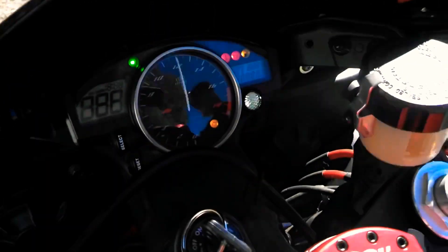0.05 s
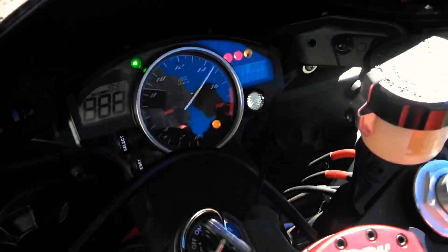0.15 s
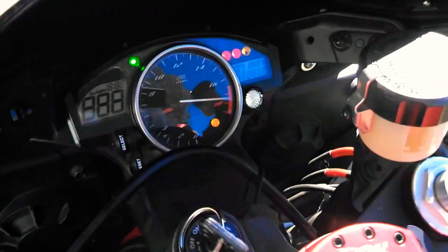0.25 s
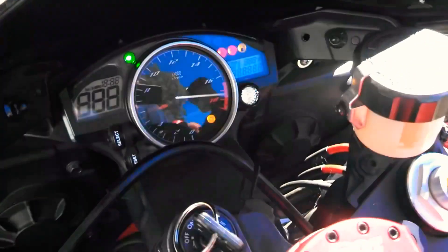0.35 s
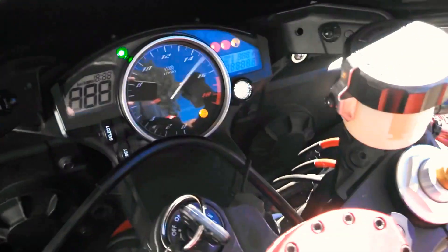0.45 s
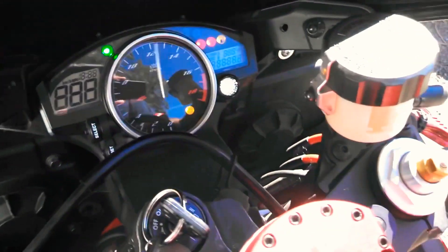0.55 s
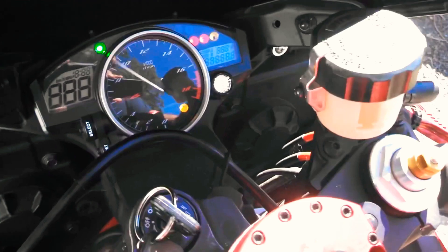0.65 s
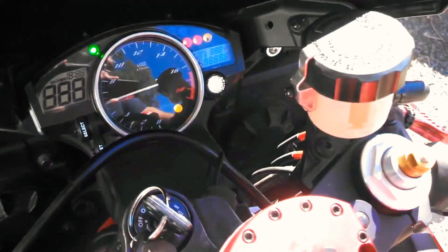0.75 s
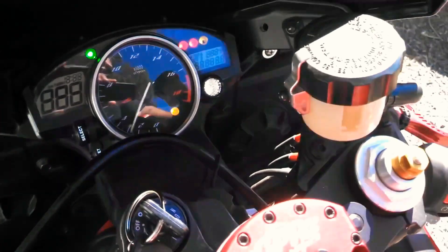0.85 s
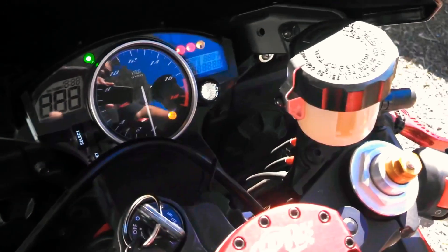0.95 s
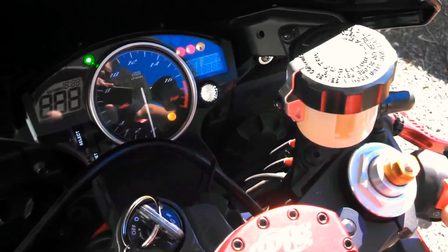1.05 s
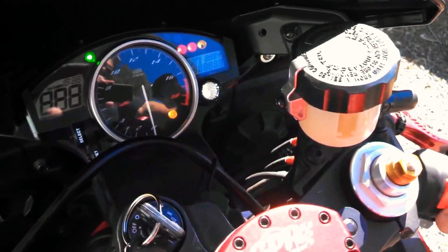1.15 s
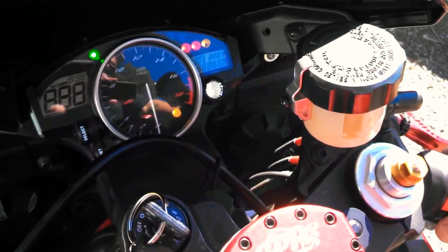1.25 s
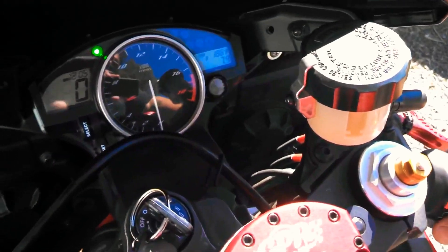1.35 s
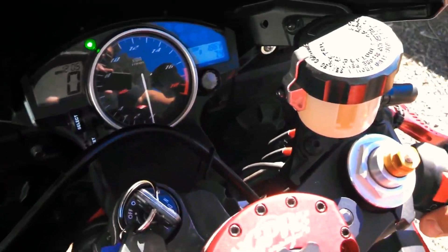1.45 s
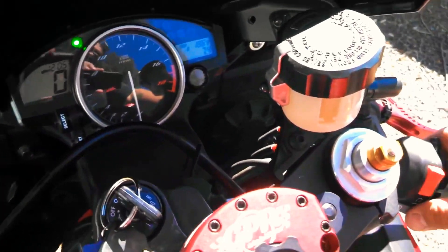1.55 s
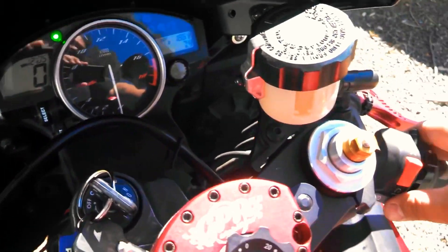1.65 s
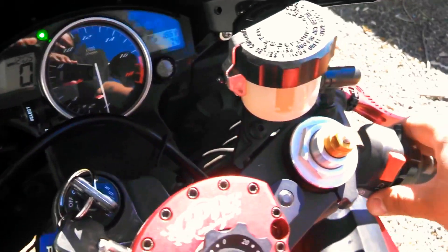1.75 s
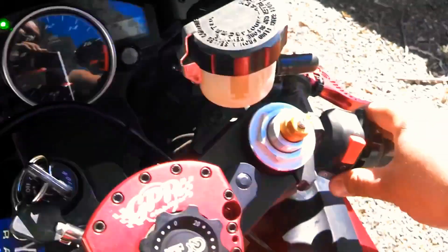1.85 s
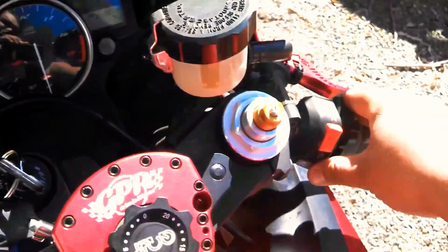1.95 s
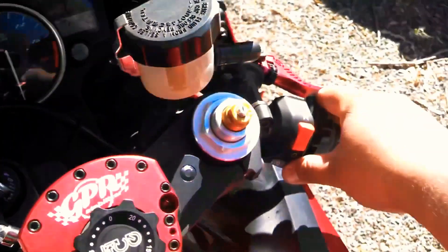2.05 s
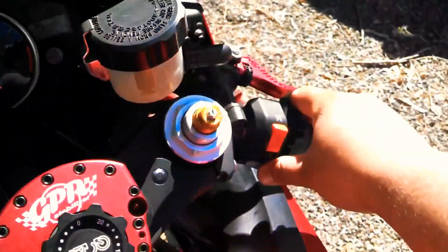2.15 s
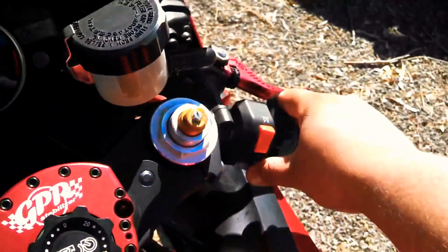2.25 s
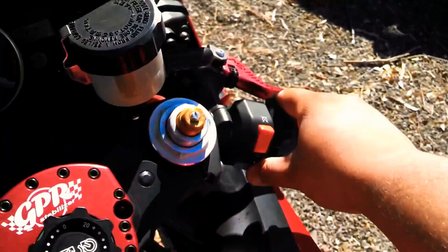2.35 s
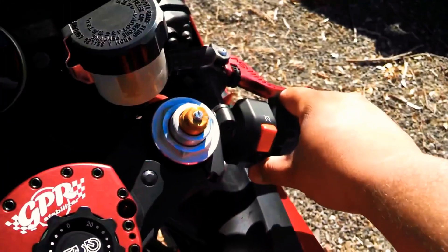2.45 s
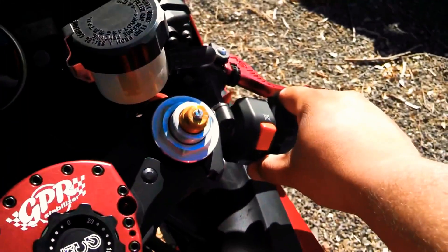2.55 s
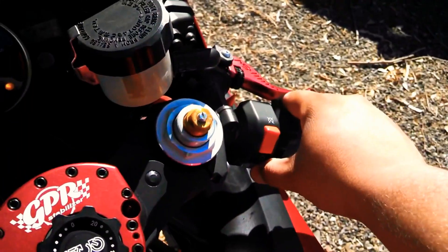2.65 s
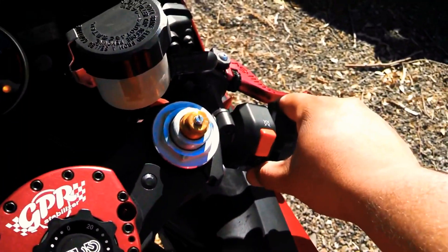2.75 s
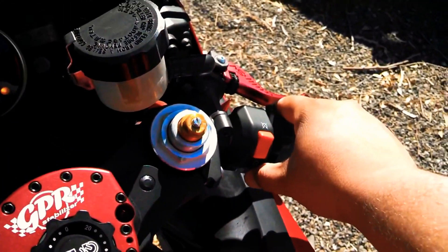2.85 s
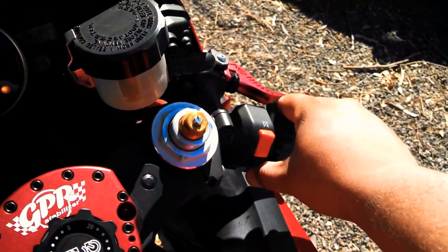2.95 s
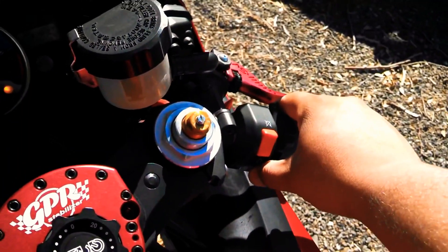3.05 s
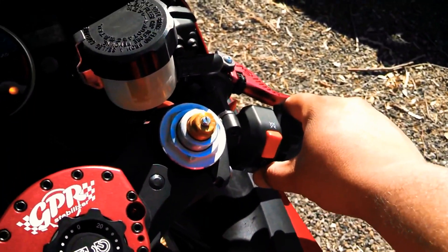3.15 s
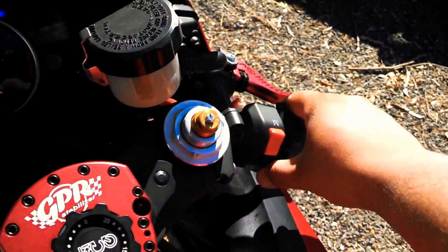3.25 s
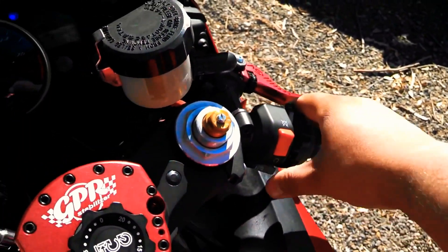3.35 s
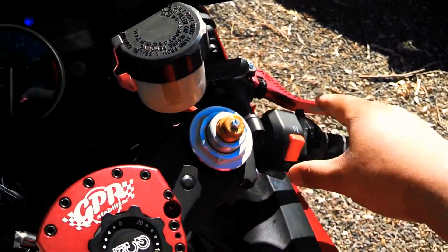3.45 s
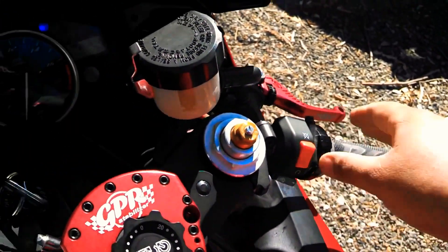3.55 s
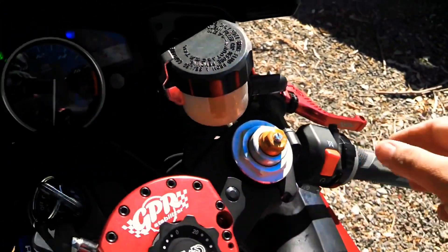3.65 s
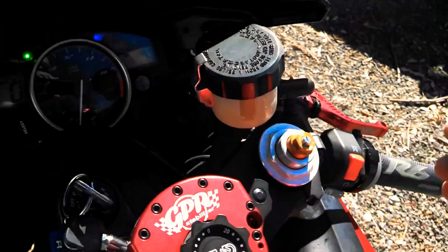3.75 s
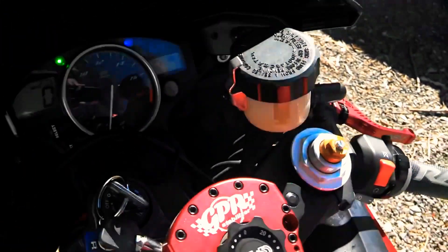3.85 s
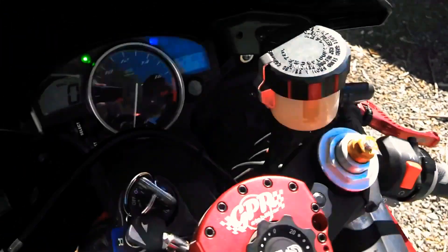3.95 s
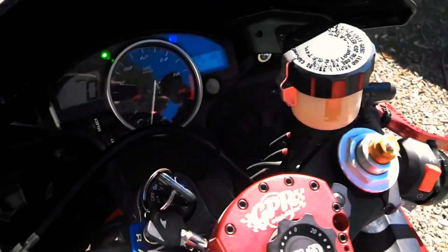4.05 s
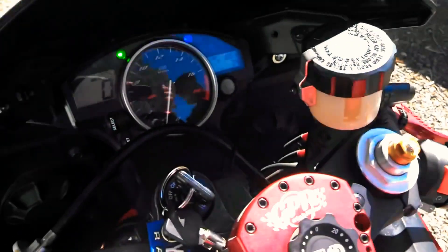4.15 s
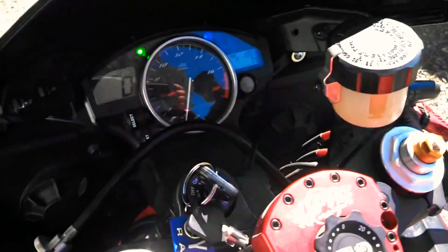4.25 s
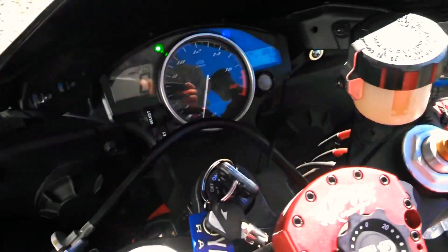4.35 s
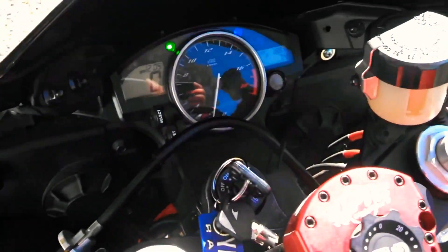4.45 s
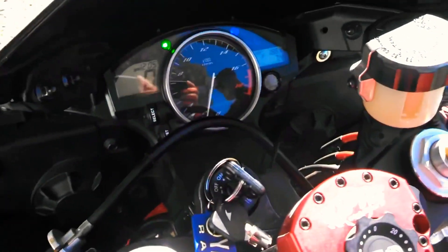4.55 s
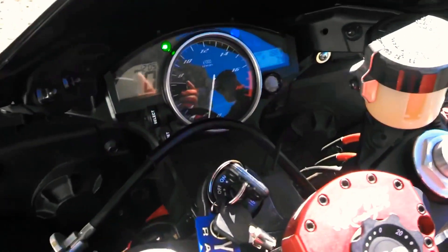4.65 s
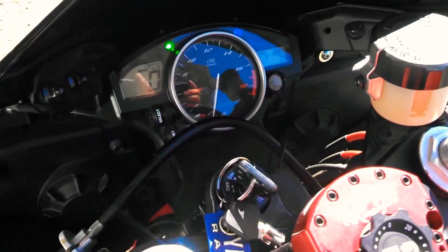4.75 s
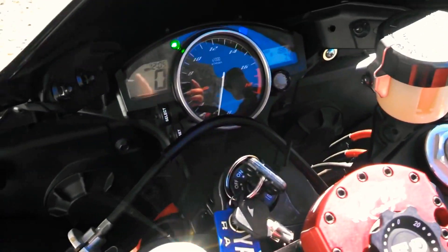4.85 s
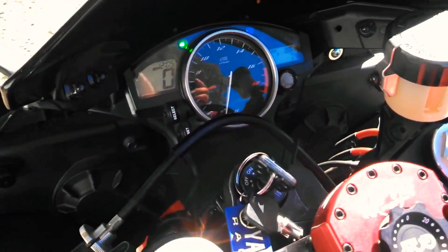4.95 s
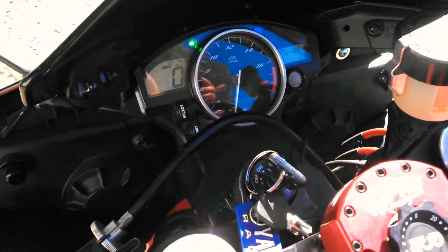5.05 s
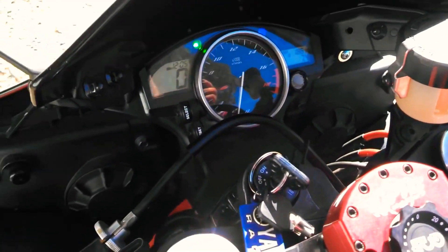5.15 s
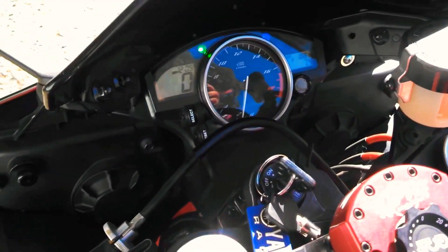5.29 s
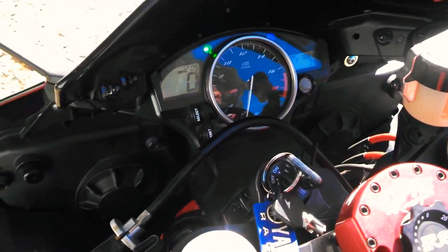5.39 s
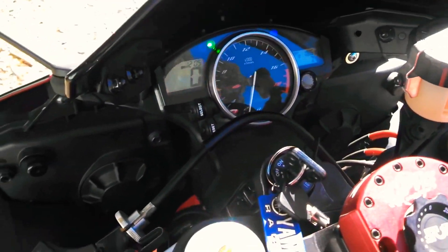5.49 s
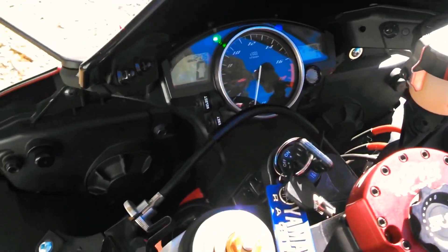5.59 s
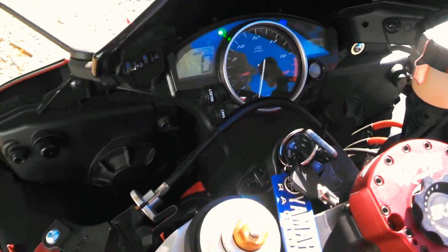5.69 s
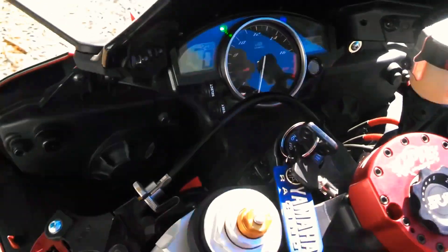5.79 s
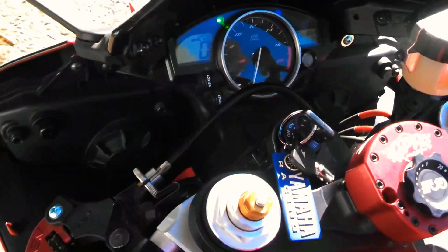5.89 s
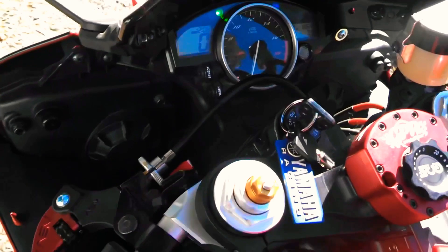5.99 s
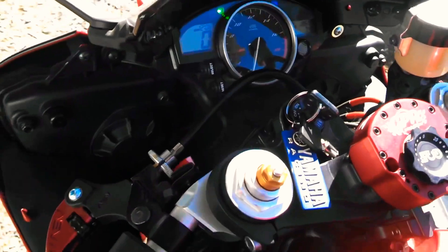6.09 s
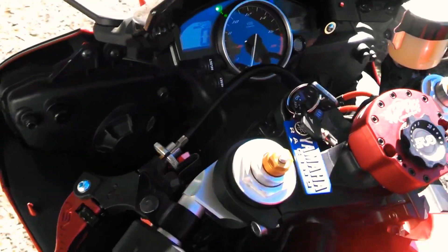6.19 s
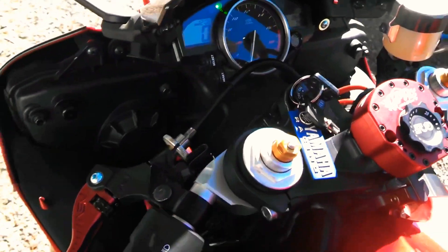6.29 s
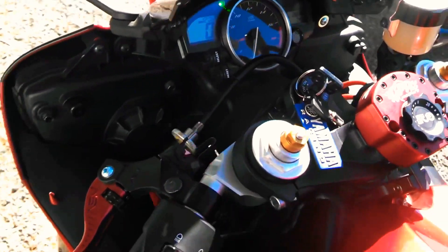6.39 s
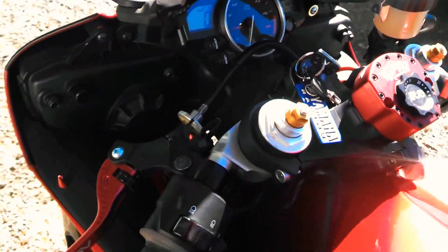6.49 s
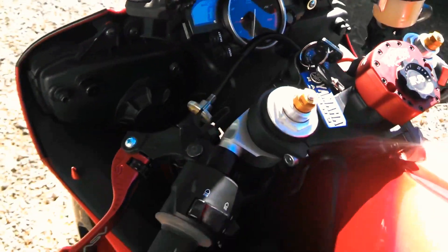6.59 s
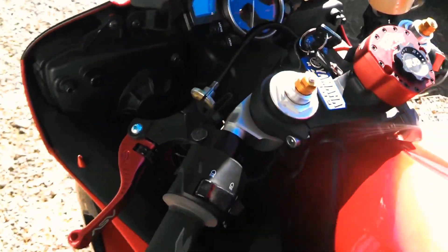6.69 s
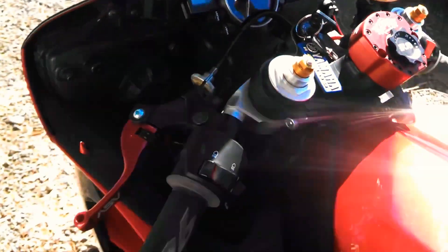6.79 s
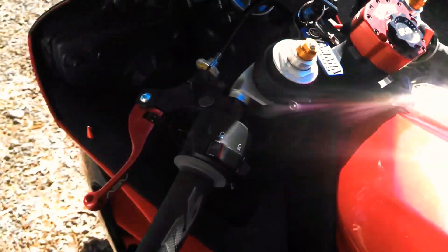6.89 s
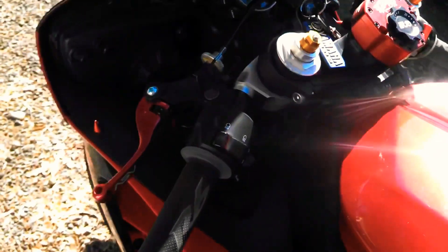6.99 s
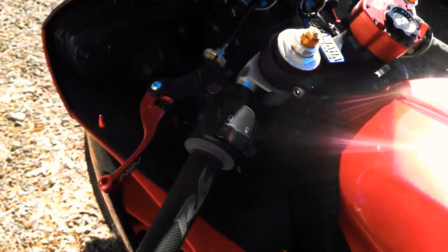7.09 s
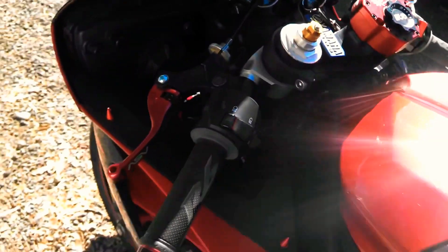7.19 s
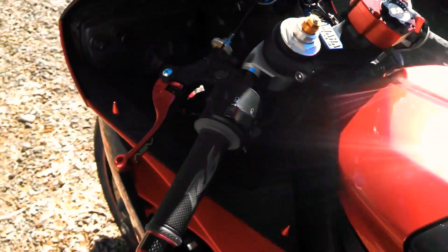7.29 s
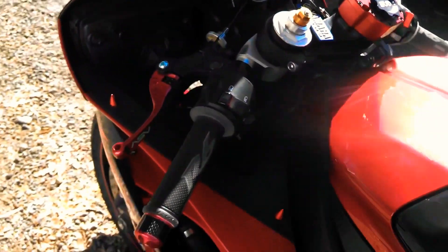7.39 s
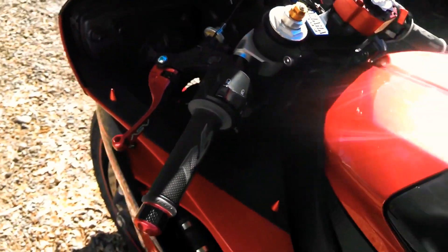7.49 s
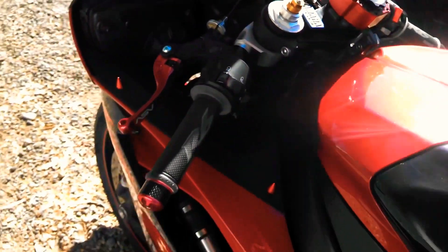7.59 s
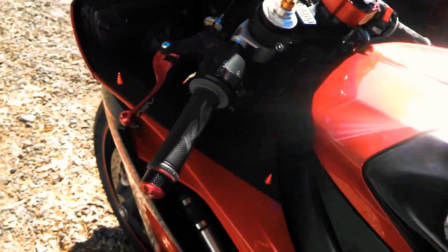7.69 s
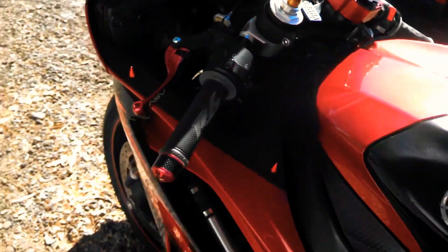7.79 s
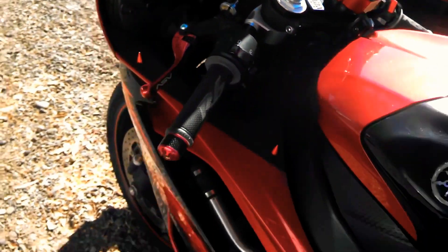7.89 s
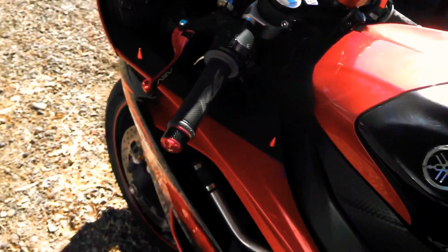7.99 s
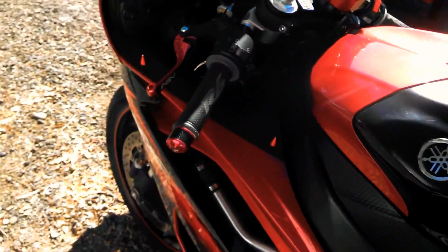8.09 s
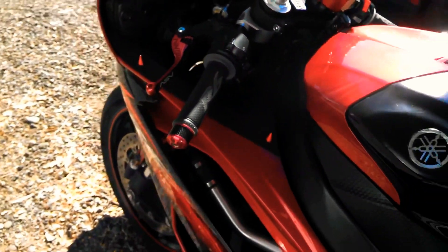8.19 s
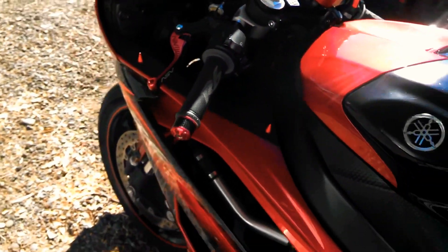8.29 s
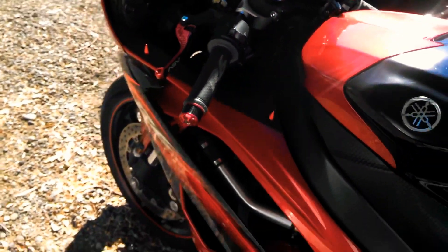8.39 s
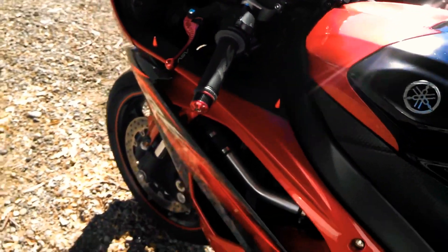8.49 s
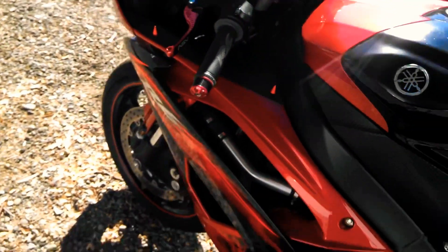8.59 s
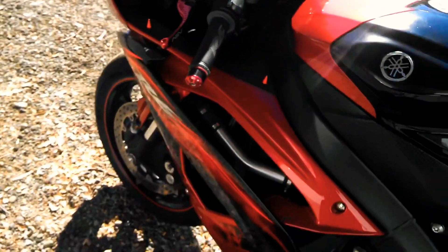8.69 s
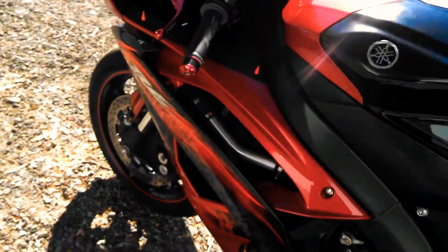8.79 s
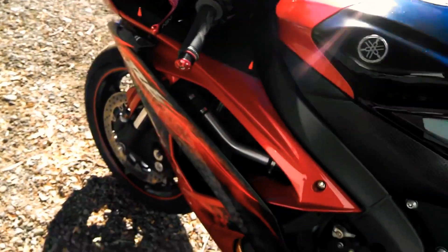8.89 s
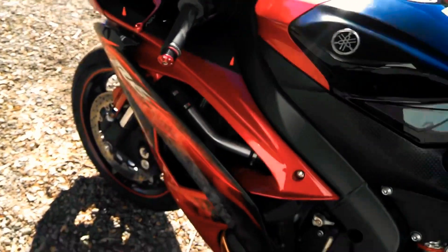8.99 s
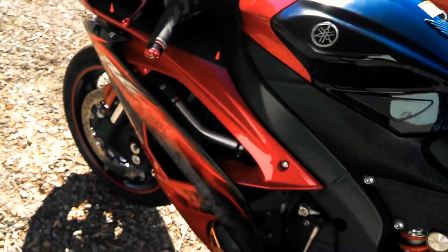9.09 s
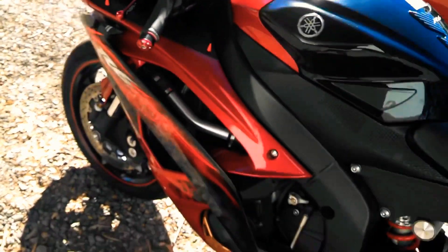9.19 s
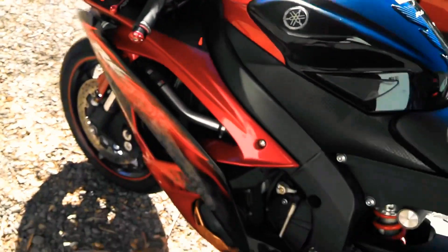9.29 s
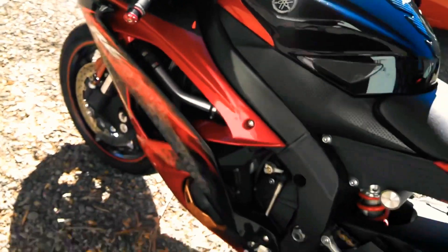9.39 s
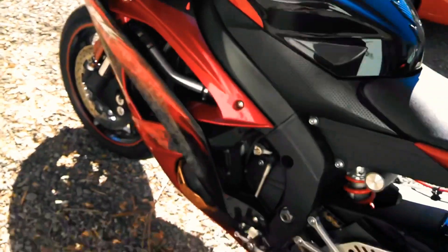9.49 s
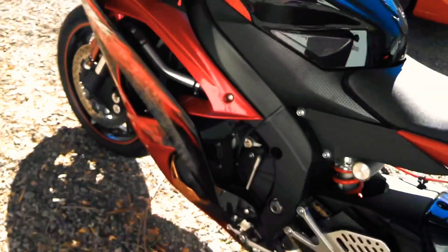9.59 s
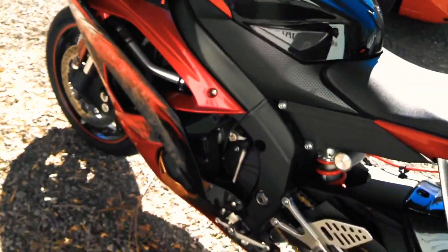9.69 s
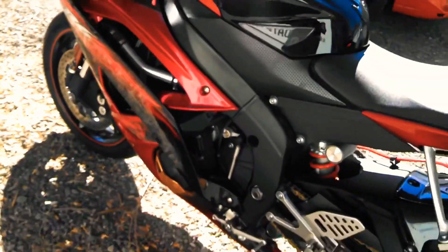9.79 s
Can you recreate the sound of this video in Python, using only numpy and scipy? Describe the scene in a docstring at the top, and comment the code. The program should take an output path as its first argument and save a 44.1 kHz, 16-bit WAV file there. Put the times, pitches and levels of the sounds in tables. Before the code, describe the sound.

From 0 to 2.6 s it is quiet outdoors beside a motorcycle: faint air and hiss that rise around 1 s, soft low handling bumps, small clacks near 0.5 s, a brief squeaky rub at 1.05 s, and a thin wavering electric whine around 4.6 kHz. At 2.7 s the starter grinds in bursts, its gear whine rising then sagging, with a soft chuff and a clack around 2.9. At about 3.1 s the engine catches, flares loudly, stumbles, flares again near 3.4, and by 4.5 sinks to idle. The low exhaust throb, around 50 firings per second, surges about twice a second with occasional misfires, over casing rattle, knocks and hiss. From 6.2 s the listener moves along the side; clatter and knocking soften while the boom continues. Wind thumps the microphones around 8.4-8.5 s. It stops abruptly at 9.8 s, still idling.

```python
"""A four-cylinder sportbike on an open gravel lot, heard from the handlebars.
Air noise, handling bumps, clacks and squeaks come first, with an electric whine as the ignition is on.
The starter grinds in bursts: tooth noise plus mesh harmonics. The engine catches, flares and sinks to a
hunting idle: firing-rate harmonics and noise ring the exhaust and casing while the listener walks to its side.
The small recorder limits its peaks; its channels are opposed in the bass, and the hiss differs in each."""
import sys
import numpy as np
from scipy import signal
from scipy.fft import rfft, irfft
from scipy.io import wavfile
from scipy.ndimage import uniform_filter1d, minimum_filter1d

SR = 44100
rng = np.random.default_rng(int(sys.argv[2]) if len(sys.argv) > 2 else 0)


def to_wav(s):
    """Save 16-bit WAV."""
    ch = np.atleast_2d(s).T  # columns
    pcm = np.round(np.clip(ch, -1, 1) * 32767)  # PCM
    wavfile.write(sys.argv[1], SR, pcm.astype(np.int16))


N = 433944
TIME = np.arange(N) / SR
CUTOFF_HZ = 15600
MID_FIRINGS_PER_S, SURGE_FIRINGS_PER_S = 50.7, 0.97  # the tone changes over this range around mid speed

# starter bursts between compressions: (start [s], length [s], level [dB])
STARTER_BURSTS = [(2.687, 0.018, -21), (2.717, 0.14, -15.5), (2.92, 0.018, -10), (2.96, 0.0083, -16),
                  (3.027, 0.023, -13.5)]
# engine catches, flares and sinks to its idle: (time [s], rate [firings/s])
ENGINE_SPEED = [(3.092, 31.2), (3.16, 51), (3.27, 40.3), (3.38, 67), (3.52, 57.5), (3.59, 63.15),
                (3.69, 58.6), (4.26, 55.8), (4.51, 56.55), (4.57, 50.73), (5.67, 47.31), (6.05, 50.95),
                (7.7, 46.32), (8.4, 48.79), (9.84, 47.27)]


def from_db(db):
    """Decibels to gain."""
    return 10 ** (np.asarray(db) / 20)


def rms_one(x):
    """Scale to unit power."""
    return x / np.sqrt(np.mean(x ** 2) + 1e-20)


def in_time(rows):
    """Each column of a curve at every sample."""
    s, *columns = np.transpose(rows)
    return [np.interp(TIME, s, column) for column in columns]


def during(rows):
    """One within a curve's span, with short ramps."""
    inside = (TIME > rows[0][0]) & (TIME < rows[-1][0])
    return uniform_filter1d(inside * 1., size=200)


def over_hz(points):
    """A table over log frequency, read at every FFT bin."""
    hz, value = np.transpose(points)
    bin_hz = np.arange(N // 2 + 1) * SR / N
    return np.interp(np.log(bin_hz + 1e-3), np.log(hz), value)


def cut(x, hz, kind, order=2):
    """Butterworth low- or high-pass."""
    return signal.sosfilt(signal.butter(order, hz, kind, fs=SR, output="sos"), x)


def coloured(x, colour):
    """Shape the spectrum of x; unit power."""
    return rms_one(irfft(rfft(x) * from_db(over_hz(colour)), N))


def white(channels=()):
    """White noise, unrelated in each channel."""
    return rng.standard_normal((channels, N) if channels else N)


def drift(rate_hz):
    """Random wander: straight lines between normal draws, rate_hz draws per second."""
    return np.interp(TIME * rate_hz, np.arange(8192), rng.standard_normal(8192))


def swell(s, length_s):
    """A rounded hump of height one."""
    return np.exp(-np.abs(2 * (TIME - s) / length_s) ** 2.4)


def resonate(x, modes):
    """Parallel two-pole resonances."""
    out = 0
    for hz, width_hz, db in modes:
        r = np.exp(-np.pi * width_hz / SR)
        poles = [1, -2 * r * np.cos(2 * np.pi * hz / SR), r * r]
        gain = from_db(db) * (1 - r * r) / 2
        out = out + gain * signal.lfilter([1, 0, -1], poles, x + 1e-18)
    return out


def evened(x):
    """Near-unit power over every few firings."""
    power = uniform_filter1d(uniform_filter1d(x * x, size=2600), size=2600)
    return x / np.sqrt(np.maximum(power, 0) + .01 * np.mean(x * x))


def puffs(at, strength_db, spread_db, jitter_s):
    """One impulse per given time, each a little different in size and moment."""
    chance = rng.standard_normal((len(at), 2))
    index = ((at + jitter_s * chance[:, 0]) * SR).astype(int)
    out = np.zeros(N)
    out[np.clip(index, 0, N - 1)] = -from_db(strength_db + spread_db * chance[:, 1])
    return out


def grains(per_s, spread_db):
    """Random tiny metal contacts of uneven size; unit power."""
    return rms_one((rng.random(N) < per_s / SR) * white() * from_db(spread_db * white()))


def direct(x):
    """A near source: a frequency-dependent phase and level turn the channels apart, strongly in the bass."""
    # left channel against the right: (frequency [Hz], phase lead [rad], level [dB])
    left_port = [(45.7, 3, 4), (63.5, 2.72, -3.5), (96, 2.55, 0), (163, 1.63, -2.5), (322, 1.57, -3.5),
                 (446, 1, 2), (790, 0.73, 1.5), (1300, 0, -1), (1840, 1, -4), (2690, 3, 0), (3650, 1.8, -6),
                 (4600, 0.84, -2), (5500, 4, -5), (6600, 0.5, -8.5)]
    port, spectrum = np.array(left_port), rfft(x)
    half = np.exp(.5j * over_hz(port[:, [0, 1]])) * from_db(over_hz(port[:, [0, 2]]) / 2)
    return irfft([spectrum * half, spectrum / half], N)


def diffuse(pair, cross_delay_s=.000363):
    """Noise differs at the two microphones; each channel subtracts the other, slightly delayed."""
    return (pair - np.roll(pair[::-1], round(cross_delay_s * SR), axis=1)) / np.sqrt(2)


def lot(rumble_db=-41.5):
    """Coloured noise for open air, low noise for puffs of wind and the hand on the recorder."""
    # outdoor air: (time [s], low rush before trim [dB], high hiss before trim [dB])
    air = [(0.0, -45.5, -51), (1.09, -33.5, -40.5), (2.62, -33, -41)]
    # (frequency [Hz], density [dB per Hz])
    air_colour = [(100, -1), (200, -2), (350, 0), (800, -4), (1300, -10.5), (2400, -13.5), (4000, -37)]
    # (frequency [Hz], density [dB per Hz])
    air_hiss_colour = [(2000, 8.5), (4000, 5.5), (7000, 2.5), (10500, 0), (13500, 6.5), (15500, 7)]
    # low handling bumps: (middle [s], length [s], level [dB])
    bumps = [(0.323, 0.2, -32), (.86, 0.14, -31)]
    # puffs of wind on the microphones: (middle [s], length [s], level [dB])
    buffets = [(8.43, 0.045, -16), (8.514, .04, -21)]

    rush_db, hiss_db = in_time(air)
    rush = cut(cut(white(), 1240, "low"), 140, "high")
    rush = coloured(rush, air_colour) * from_db(rush_db + 1.0)
    hiss = cut(cut(white(channels=2), 2830, "high"), CUTOFF_HZ, "low", order=8)
    hiss = coloured(hiss, air_hiss_colour) * from_db(hiss_db + 0.6)
    handling = from_db(rumble_db) + sum(from_db(db) * swell(s, length_s) for s, length_s, db in bumps)
    rumble = rms_one(cut(cut(white(), 85, "low", order=4), 45, "high")) * handling
    gusts = sum(from_db(db) * swell(s, length_s) for s, length_s, db in buffets)
    wind = rms_one(cut(cut(white(channels=2), 290, "low", order=4), 90, "high")) * gusts
    return direct(rush + rumble) + diffuse(hiss + wind)


def cockpit():
    """A wavering two-harmonic electric whine, clacks of decaying modes, squeaks of resonant noise."""
    # electric whine with the ignition on: (time [s], pitch [Hz], level [dB])
    whine_curve = [(0, 4730, -69.5), (.9, 4640, -58), (1.2, 4630, -51.5), (1.9, 4600, -53),
                   (2.15, 4600, -44.5), (2.4, 4580, -52), (3.1, 4600, -54)]
    # clacks of the bike's mechanisms: (time [s], relative level [dB])
    clacks = [(.538, -19), (.541, -20.5), (0.545, -21), (1.029, -29), (2.903, -14)]
    # (frequency [Hz], relative level [dB], 60 dB decay [s])
    clack_modes = [(440, -4.5, 0.09), (660, 6.5, 0.025), (1120, 2, 0.023), (1580, -3, 0.019),
                   (1860, -9, 0.03), (3570, -16, 0.025)]
    # rubs and squeaks in the controls: (middle [s], length [s], frequency [Hz], width [Hz], level [dB])
    squeak_rows = [(0.42, 0.0087, 7000, 2500, -42), (1.031, 0.016, 4400, 900, -40),
                   (1.05, .055, 1580, 300, -38)]

    whine_hz, whine_db = in_time(whine_curve)
    turn = 2 * np.pi * np.cumsum(whine_hz + 14 * drift(120)) / SR
    whine = np.sqrt(2) * (np.sin(turn) + from_db(-15) * np.sin(2 * turn))
    whine = whine * from_db(whine_db + 2 * drift(45))
    clicks = np.zeros(N)
    for s, db in clacks:
        clicks[int(s * SR)] = from_db(db)
    age = TIME[:SR // 8]
    ring = sum(from_db(db - 60 * age / t60_s) * np.sin(2 * np.pi * hz * age)
               for hz, db, t60_s in clack_modes)
    rub, squeaks = white(), 0
    for s, length_s, hz, width_hz, db in squeak_rows:
        tone = rms_one(resonate(rub, [(hz, width_hz, 0)]))
        squeaks = squeaks + tone * from_db(db) * swell(s, length_s)
    return direct(whine * during(whine_curve) + 0.58 * signal.fftconvolve(clicks, ring)[:N] + squeaks)


def bursts(release_db_per_s, attack_db_per_s=2203):
    """Level [dB] of the starter's load: each stroke sets in fast, holds and falls away."""
    levels = [db - attack_db_per_s * np.maximum(s - TIME, 0)
              - release_db_per_s * np.maximum(TIME - s - length_s, 0)
              for s, length_s, db in STARTER_BURSTS]
    return np.max(levels, axis=0).clip(-200)


def starter(wobble=0.0129, chuff_s=2.835, chuff_db=-13, rough_db=2.0):
    """Gear teeth grind and sing in a stack of harmonics; one cylinder gives a soft first chuff."""
    # (frequency [Hz], density [dB per Hz])
    grind_colour = [(200, -1), (500, -4.5), (800, -1), (1150, 7), (1600, -4), (2200, 2.5), (3000, 0),
                    (3800, -2.5), (5500, -12), (9500, -7.5), (15000, -16)]
    # starter housing: (frequency [Hz], width [Hz], relative gain [dB])
    housing_modes = [(1160, 47, -2), (1550, 56, 12.5), (3790, 110, 2)]
    # gear mesh spins up, then each compression slows it: (time [s], mesh rate [Hz])
    mesh = [(2.68, 329.6), (2.74, 718), (2.78, 856), (2.82, 952), (2.85, 867), (2.885, 766), (2.915, 680),
            (2.945, 642), (2.975, 536), (3.012, 505.5), (3.022, 730), (3.045, 659), (3.07, 572), (3.1, 602)]
    # housing resonances that the mesh sweeps through: (frequency [Hz], width [Hz], gain [dB])
    mesh_peaks = [(1104, 80, 12), (1523, 98, 14.5), (2630, 200, 11.5)]
    # mesh harmonics from the first up: (level against the load [dB])
    gear_partials = [-13, -7.5, -11, -9, -14]
    # (frequency [Hz], level [dB], 60 dB decay [s])
    gear_ring = [(3820, -32.5, 2.0), (9959, -48, 2.2)]

    contacts = white(channels=2) + 0.15 * grains(per_s=1600, spread_db=4)
    teeth = coloured(cut(contacts, 81, "high"), grind_colour)
    teeth = rms_one(teeth + 0.76 * resonate(teeth, housing_modes))
    grind = teeth * from_db(bursts(release_db_per_s=240) + rough_db * drift(400))
    # the singing stops sooner than the grinding
    load_db, sing = bursts(release_db_per_s=520), 0
    mesh_hz, = in_time(mesh)
    turn = 2 * np.pi * np.cumsum(mesh_hz * (1 + wobble * drift(500))) / SR
    for k, level_db in enumerate(gear_partials, 1):
        peak_db = sum(db / (1 + (2 * (k * mesh_hz - hz) / width_hz) ** 2) for hz, width_hz, db in mesh_peaks)
        partial = np.sqrt(2) * np.sin(k * turn + .5 * drift(450))
        sing = sing + partial * from_db(load_db + level_db + peak_db + 3.1 * drift(300))
    # struck gears ring on from the start of the last stroke
    since = np.maximum(TIME - STARTER_BURSTS[-1][0], 0)
    ring = sum(np.sin(2 * np.pi * hz * since) * from_db(db - 60 * since / t60_s)
               for hz, db, t60_s in gear_ring)
    ring = ring * from_db(2.8 * drift(40))
    age = np.maximum(TIME - chuff_s, 0)
    thump = np.sin(2 * np.pi * 65 * age) + np.sin(2 * np.pi * 125 * age)
    chuff = from_db(chuff_db) * np.exp(-age / .04) * thump
    near = cut(grind[0], 1670, "low", order=4) + sing * during(mesh) + chuff + ring
    return direct(near) + diffuse(cut(grind, 2370, "high", order=4))


def firing_rate():
    """Firings per second: the run-up plus the surges of the hunting idle."""
    # surges about twice a second and one sag: (middle [s], length [s], extra rate [firings/s])
    surges = [(4.821, .24, 7.5), (5.38, .36, 6), (5.851, .2, 7), (6.37, .17, 7), (6.83, .26, 6),
              (7.122, .14, -3), (7.471, .4, 6.5), (8.03, .44, 7), (8.72, .33, 6), (9.348, .28, 7.5)]
    return in_time(ENGINE_SPEED)[0] + sum(extra * swell(s, length_s) for s, length_s, extra in surges)


def exhaust_note(rate, cycle, walk, firing_db, waver_db=1.6, boom_share=0.087):
    """Firing harmonics slide through pipe resonances; the first, the airbox boom, opposes the rest."""
    # (frequency [Hz], harmonic level there [dB], gain over the walk [dB])
    note_colour = [(45, -34, -9), (49.7, -15.5, -3), (54.3, -9, -3), (63, -7.5, -3.5), (74, -8, -3),
                   (98, -12, -1), (109, -17, 2), (136, -11.5, -3.5), (152, -12, -4), (175, -20, 1.5),
                   (207, -29, 10.5), (225, -25, 5), (248.4, -31.5, -4), (281.7, -18.5, -4.5),
                   (285.5, -17.5, -17.5), (311, -25.5, -6.5), (351, -19, -12), (413, -28.5, -14),
                   (450.6, -20.5, -11.5), (482, -42.5, 5), (555, -39.5, 5.5)]
    hz, db, walk_db = np.transpose(note_colour)
    out = 0
    for k in range(1, 11):
        level_db = np.interp(k * rate, hz, db) + walk * np.interp(k * rate, hz, walk_db)
        level_db = level_db + waver_db * drift(22)
        if k == 1:  # the boom hardly minds a weak firing
            gain = from_db(level_db + boom_share * firing_db)
        else:
            gain = -from_db(level_db + firing_db)
        out = out + np.sqrt(2) * gain * np.cos(2 * np.pi * k * cycle)
    return out


def knocks(at, lead_s=0.003016, hard_db=4):
    """A knock rings the casing once per crank turn, every second firing; a few land hard."""
    # (frequency [Hz], width [Hz], relative gain [dB])
    knock_modes = [(1481, 130, 0)]
    # (time [s], level [dB])
    knock_curve = [(3.1, -31), (3.5, -37.5), (4.4, -31.5), (5.7, -32.5), (6.2, -39.5), (9.8, -44)]
    # (time [s])
    hard_knocks = [4.42, 4.967, 5.092, 5.249, 5.326, 5.477, 5.869]
    at = at[::2] - lead_s
    strength_db = np.zeros(len(at))
    strength_db[[np.argmin(np.abs(at - s)) for s in hard_knocks]] = hard_db
    blows = puffs(at, strength_db, spread_db=2.4, jitter_s=0.00178)
    ringing = resonate(resonate(blows, knock_modes), knock_modes)
    return rms_one(ringing) * from_db(in_time(knock_curve)[0])


def engine(cylinder_bias=0.63, rasp_decay=1.4, clatter_swing=0.021, hiss_swing=0.14):
    """Each firing sends a puff down the exhaust; valve gear and chain rattle the casing."""
    # effort while catching, a burst, a stumble, a second burst, then coasting: (time [s], level [dB])
    effort = [(3.095, -1), (3.15, 3), (3.25, -4.5), (3.31, 3), (3.385, 3), (3.48, -5), (3.6, -1), (4.2, 1)]
    # weak or missed firings: (time [s], loss [dB])
    misfires = [(3.26, 11), (3.458, 6), (4.19, 11), (4.245, 14), (4.545, 16), (5.617, 13), (5.68, 12),
                (6.455, 21), (7.717, 17), (7.781, 15), (8.419, 12), (8.48, 18), (8.881, 4), (9.505, 15)]
    # layers: (level [dB], gain in a surge [dB], gain over the walk [dB], share of the effort)
    pipe_layer = (-18.5, 1, -5, 0.2)
    bark_layer = (-23, 2, -6, 0.8)
    clatter_layer = (-24, 0.6, -9, 1.4)
    flank_layer = (-38, 2, 7.5, 2)
    drone_layer = (-27, -1, -1, 3.4)
    # resonances of exhaust (pipe, bark), silencer (drone), casing and fairing (case), engine covers
    # (flank) and small ringing parts (metal): (frequency [Hz], width [Hz], relative gain [dB])
    pipe_modes = [(59, 25, 18.5), (111, 59, -7), (142, 28, 8)]
    bark_modes = [(284, 23, -2.5), (351.5, 44, 2.5), (451.4, 48, 1)]
    drone_modes = [(205, 18, -0.5), (252.4, 10, 4)]
    case_modes = [(545, 38, -1), (671.5, 46, 12.5), (877, 87, 17.5), (1033, 110, 1), (1152, 35, 7),
                  (1390, 90, 8.5), (1766, 57, 6.5)]
    flank_modes = [(1060, 140, 8.5), (1210, 50, -4)]
    metal_modes = [(3510, 55, -6), (3680, 40, 2), (3805, 59, 3), (9850, 300, -15)]
    # hiss of intake and valve gear: (time [s], level before surge and effort [dB])
    hiss_curve = [(3.1, -29), (3.32, -24.5), (3.48, -33.5), (4.5, -32), (5.0, -30.5), (6.8, -29.5),
                  (9.84, -32.5)]
    # (frequency [Hz], density [dB per Hz])
    hiss_colour = [(2300, -0.5), (3100, -6), (4300, -10), (5500, -16), (7500, -14.5), (10500, -21.5),
                   (13000, -16), (15000, -15.5)]

    start_s = ENGINE_SPEED[0][0]
    rate = firing_rate()
    cycle = np.cumsum(rate * (TIME > start_s)) / SR + .55
    at = TIME[1:][np.diff(np.floor(cycle)) > 0]

    # layer levels follow the speed, the effort and the walk to the side of the bike
    surge = np.tanh((rate - MID_FIRINGS_PER_S) / SURGE_FIRINGS_PER_S)
    effort_db, = in_time(effort)
    walk = np.interp(TIME, [6.18, TIME[-1]], [0, 1])
    pipe_db, bark_db, clatter_db, flank_db, drone_db = (
        db + surge_db * surge + walk_db * walk + share * effort_db
        for db, surge_db, walk_db, share in (pipe_layer, bark_layer, clatter_layer, flank_layer, drone_layer))
    hiss_db = in_time(hiss_curve)[0] + 0.88 * surge + 0.27 * effort_db

    # a misfire weakens the nearest firing; firings vary by chance, strong and weak ones alternate
    firing = np.floor(cycle + .25).astype(int)
    loss_db = sum(db * (firing == np.round(np.interp(s, TIME, cycle))) for s, db in misfires)
    firing_db = 1.2 * white()[firing] + 0.64 * (-1.) ** firing - loss_db
    firing_db = uniform_filter1d(firing_db, size=150)
    note = exhaust_note(rate, cycle, walk, firing_db) * from_db(effort_db)

    # each firing's departure from the mean makes the pipe ring raggedly
    excess = np.zeros(N)
    bias = cylinder_bias * np.resize([0.88, -1.26, 0.42, -0.62], len(at))
    excess[(at * SR).astype(int)] = bias + rng.standard_normal(len(at))
    # turbulent gas follows each puff and fades toward the next
    gush = np.exp(-rasp_decay * (cycle % 1)) * from_db(-loss_db)
    gas = rms_one(white() * gush)
    blowdown = 0.34 * rms_one(excess) + gas
    pipe = evened(cut(cut(resonate(blowdown, pipe_modes), 273, "low"), 52.6, "high", order=4))
    bark = evened(cut(cut(resonate(blowdown, bark_modes), 458, "low", order=6), 290, "high"))
    drone = evened(cut(resonate(blowdown, drone_modes), 385, "low"))

    # steady chain rattle and two valve taps per firing
    rattle = 0.79 * grains(per_s=900, spread_db=.5) + 0.87 * white()
    rattle = rattle * (1 + clatter_swing * np.cos(2 * np.pi * cycle))
    taps = puffs(at, 0, spread_db=2.5, jitter_s=0.000783)
    taps = taps + puffs(at + .5 / MID_FIRINGS_PER_S, -1.5, spread_db=3, jitter_s=.0012)
    taps = 0.56 * rms_one(taps)
    clatter = evened(cut(resonate(rattle + taps + .5 * gas, case_modes), 2150, "low", order=4))
    flank = rms_one(cut(resonate(rattle + taps + gas, flank_modes), 1600, "low"))

    # small parts ring as the engine catches, then fade at 17 dB/s against the hiss
    metal = rms_one(resonate(rattle, metal_modes)) * from_db(-7 - 17 * np.maximum(TIME - start_s, 0))
    fizz = white(channels=2) * (1 + hiss_swing * np.cos(2 * np.pi * (cycle - .2)))
    hiss = coloured(cut(fizz, 2270, "high", order=4), hiss_colour) + metal
    # the hiss swells with surge and effort and flutters at random
    hiss_gain = from_db(hiss_db + 1.76 * drift(35))

    exhaust = note + pipe * from_db(pipe_db) + bark * from_db(bark_db) + drone * from_db(drone_db)
    casing = clatter * from_db(clatter_db + drift(45)) + flank * from_db(flank_db) + knocks(at)
    running = during(ENGINE_SPEED)
    return direct((exhaust + casing) * running) + diffuse(hiss) * running * hiss_gain


def scene():
    """All sources lie close together in front of the two microphones."""
    closing = np.clip((TIME[-1] - TIME) / .012, 0, 1) ** 2
    left, right = (lot() + cockpit() + starter() + engine()) * closing
    # the balance moves from slightly right to left
    balance_db = np.interp(TIME, [0, 8, 9.84], [-.6, -.3, 1.6])
    pair = np.array([left * from_db(balance_db / 2), right * from_db(-balance_db / 2)])
    # the microphones pass no deep bass
    return cut(pair, 25, "high")


def record(dry):
    """A fast limiter holds the peaks near full scale; a steep low-pass cuts the top."""
    needed = 1 / np.maximum(np.abs(dry), 1)
    gain = uniform_filter1d(minimum_filter1d(needed, size=61), size=61)
    top_cut = signal.ellip(10, .1, 70, CUTOFF_HZ, fs=SR, output="sos")
    return signal.sosfilt(top_cut, dry * gain)


dry = scene()
out = record(dry)
to_wav(out)
```